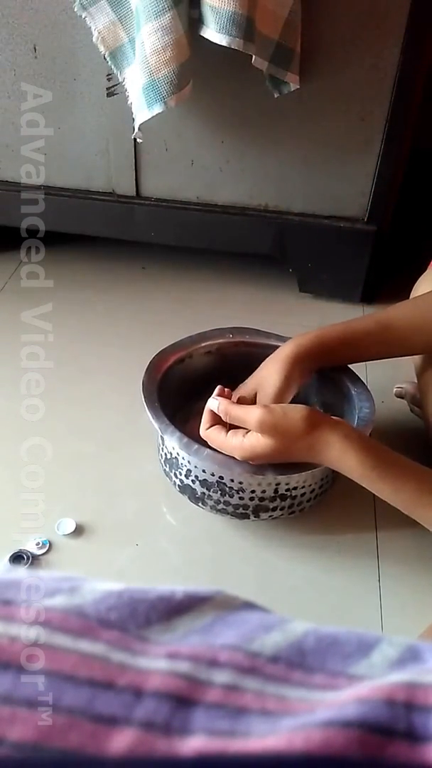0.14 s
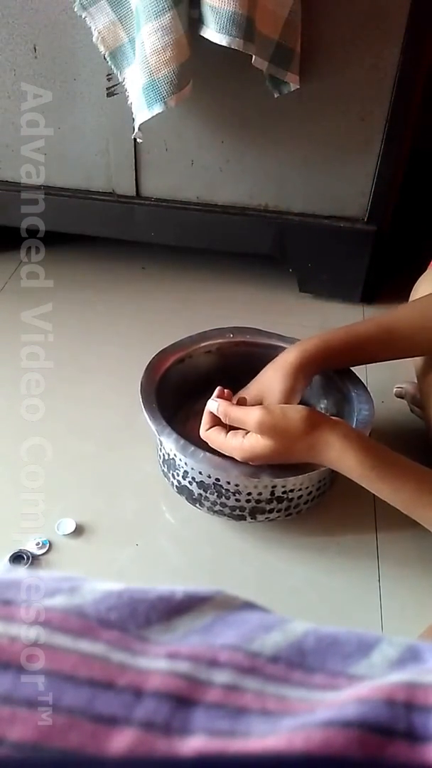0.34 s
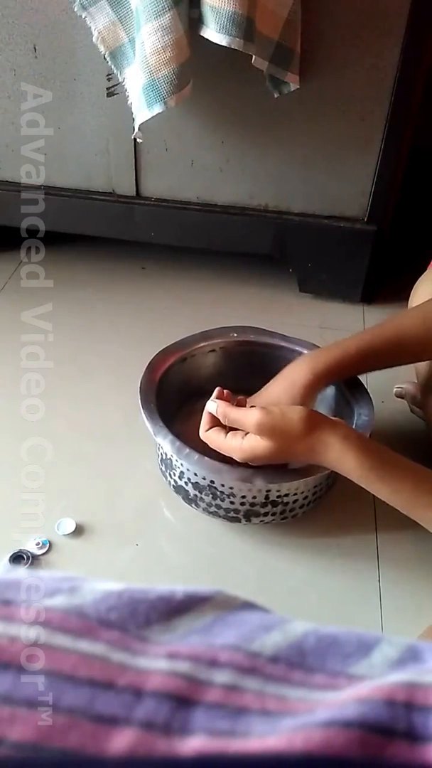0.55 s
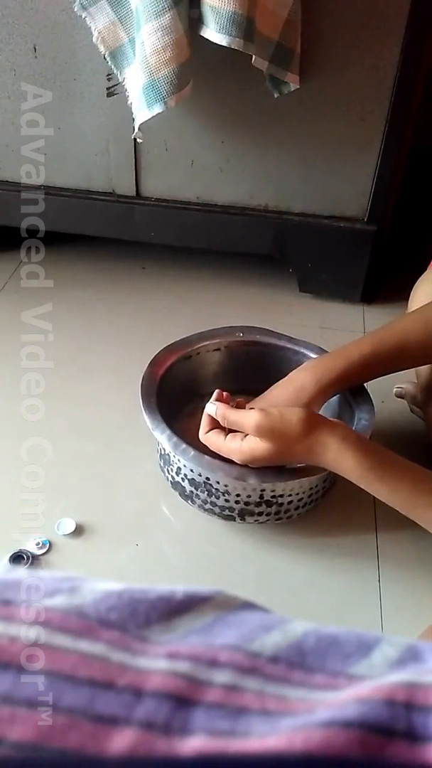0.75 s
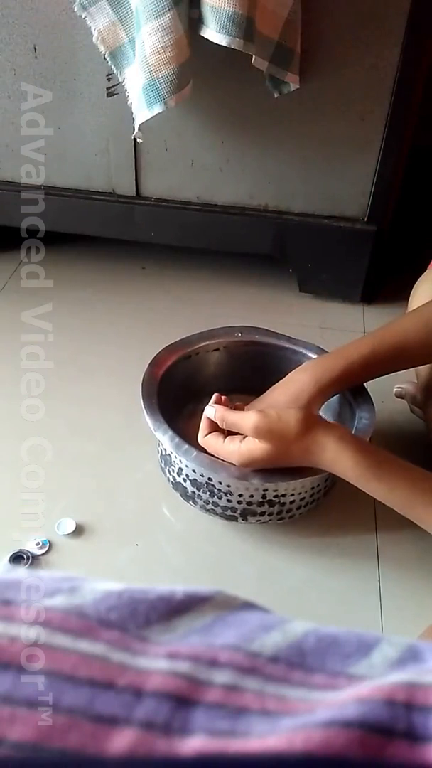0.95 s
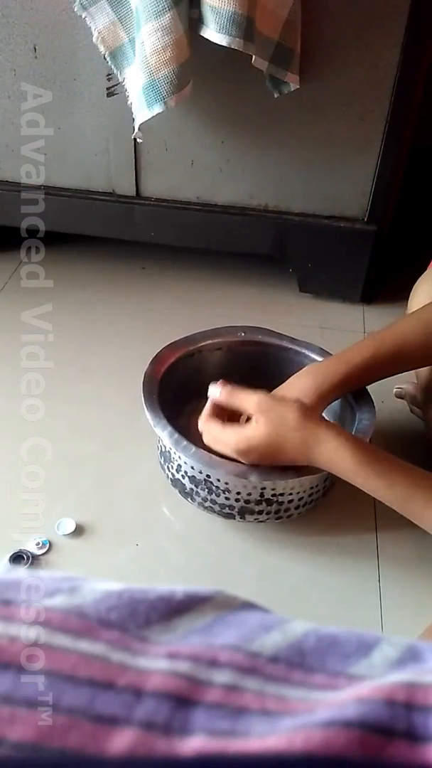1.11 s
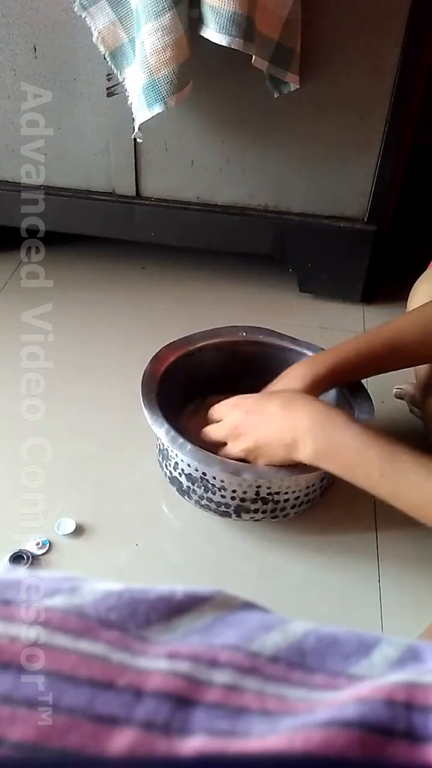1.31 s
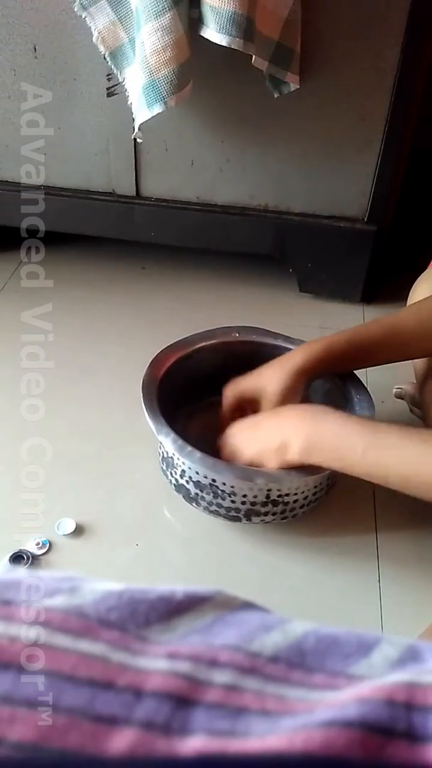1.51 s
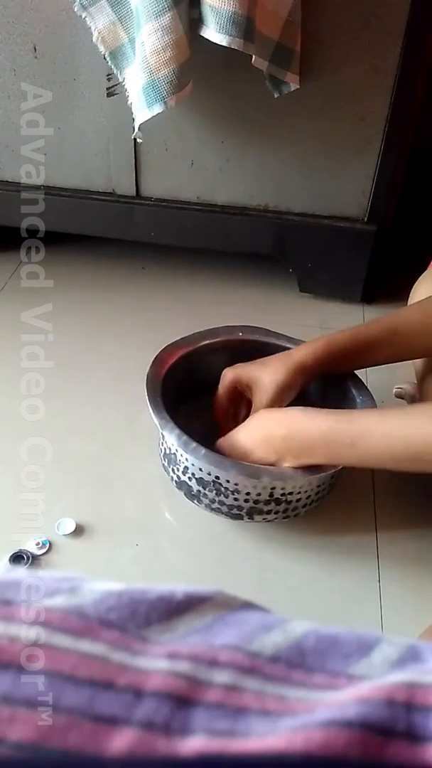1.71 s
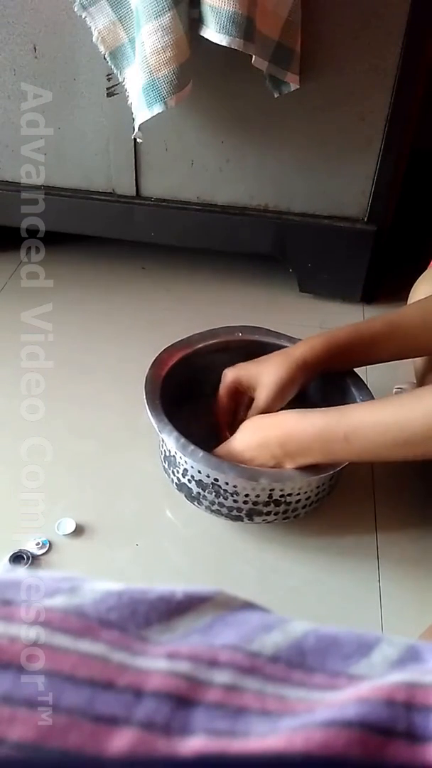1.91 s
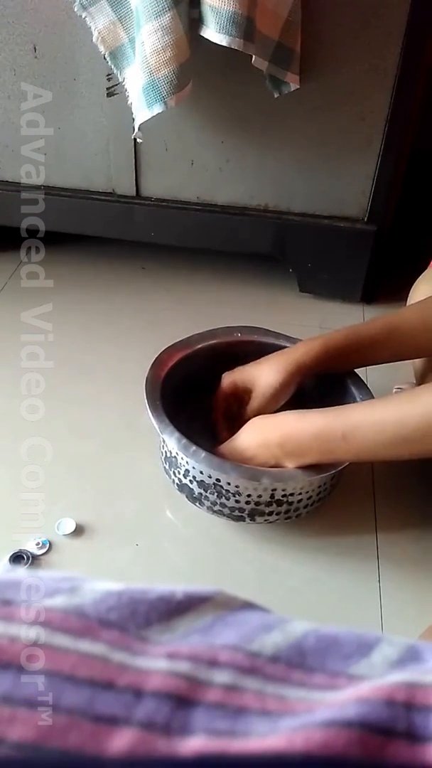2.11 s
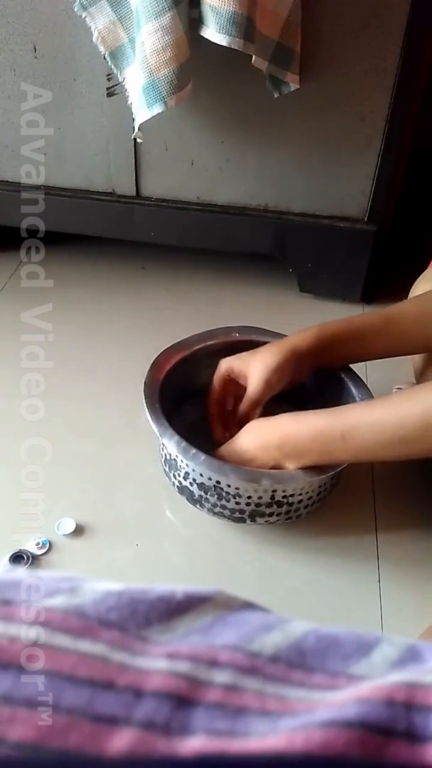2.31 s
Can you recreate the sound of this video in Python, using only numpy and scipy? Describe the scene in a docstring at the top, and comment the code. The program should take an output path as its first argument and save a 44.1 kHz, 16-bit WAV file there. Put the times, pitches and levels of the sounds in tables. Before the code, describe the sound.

A small metal bearing clinks, rattles and scrapes against a steel bowl of water in a small hard room. The knocks fade, fingers swish the water and a few drips follow, over faint hiss and hum, mostly to the right.

```python
"""A small metal bearing knocks against a steel bowl of water in a small hard room, over hiss and hum.
From 0.2 s it rattles and scrapes: each contact is a burst of noise that rings the bowl's normal modes.
Near 1.4 s the knocks fade and wet fingers swish; from 1.7 s drips sound as small resonating bubbles,
with one last faint knock among them. Throughout, the knocks reach the right microphone directly
and the left mostly by reflection off a wall."""
import sys
import numpy as np
from scipy import signal
from scipy.fft import rfft, irfft, next_fast_len
from scipy.io import wavfile
from scipy.ndimage import uniform_filter1d, minimum_filter1d

SR = 44100
rng = np.random.default_rng(int(sys.argv[2]) if len(sys.argv) > 2 else 0)


def master_out(mix):
    """Clip the mix to full scale and print it as 16-bit PCM to the path in sys.argv[1]."""
    frames = np.transpose(np.atleast_2d(mix))
    ceiling = np.clip(frames, -1, 1)
    pcm = np.round(ceiling * 32767).astype(np.int16)
    wavfile.write(sys.argv[1], SR, pcm)


N = 103635
TIME = np.arange(N) / SR


def amp(db):
    """Decibels as an amplitude ratio."""
    return 10 ** (np.asarray(db) / 20)


def unit_rms(x):
    """Normalisation to unit mean power."""
    return x / np.sqrt(np.mean(x ** 2) + 1e-20)


def curve_at(points, hz):
    """Interpolation along a logarithmic frequency axis."""
    point_hz, value = np.transpose(points)
    return np.interp(np.log(hz + 1), np.log(point_hz + 1), value)


def add(mix, start_s, sound):
    """Superposition: a sound joins the mix at its start time."""
    part = mix[max(round(start_s * SR), 0):][:len(sound)]
    part += sound[:len(part)]


def delayed(x, delay_s):
    """Propagation delay."""
    return np.concatenate([np.zeros(round(delay_s * SR)), x])[:N]


def equalised(x, gains):
    """Zero-phase filtering by a curve of gains in dB."""
    size = next_fast_len(N + 4096)
    return irfft(rfft(x, size) * amp(curve_at(gains, np.fft.rfftfreq(size, 1 / SR))), size)[:N]


def narrowband(x, hz, width_hz):
    """Resonance: two equal resonators in series select one band, returned at unit power."""
    carrier, pole = np.exp(2j * np.pi * hz * TIME), np.exp(-np.pi * width_hz / SR)
    for _ in range(2):
        x = (carrier * signal.lfilter([1 - pole], [1, -pole], x / carrier)).real
    return unit_rms(x)


# Each row: frequency in Hz, relative spectral density of the hiss in dB.
HISS_SPECTRUM = [(25, -24), (40, -1.5), (60, -7), (100, 2), (135, -14.5), (174, -11.5), (300, -17),
                 (540, -19.5), (800, -20.5), (1100, -26), (2000, -29), (2600, -31.5), (3300, -38),
                 (4200, -32), (8000, -35), (12000, -30.5), (14500, -36.5)]
# Each row: frequency in Hz, correlation between left and right from -1 to 1.
HISS_CORRELATION = [(60, -0.91), (150, -0.84), (400, -.5), (1200, .1), (5000, -0.044)]
def hiss(level_db=-59.5, flicker_db=2.0):
    """Partial coherence: room and microphone noise, with left and right out of phase in the bass."""
    hz = np.fft.rfftfreq(1024, 1 / SR)
    a, b, c, d, flicker = rng.standard_normal((N // 256 + 5, len(hz), 5)).T
    left, independent = a + 1j * b, c + 1j * d
    correlation = curve_at(HISS_CORRELATION, hz)[:, None]
    right = correlation * left + np.sqrt(1 - correlation ** 2) * independent
    flicker = unit_rms(uniform_filter1d(uniform_filter1d(flicker, 12, axis=0), 10, axis=1))
    spectra = np.array([left, right]) * amp(curve_at(HISS_SPECTRUM, hz)[:, None] + flicker_db * flicker)
    noise = signal.istft(spectra, nperseg=1024, noverlap=768)[1][:, :N]
    return amp(level_db) * unit_rms(noise)


# Each row: centre frequency in Hz, level in dB before the channel weights, resonator width in Hz.
HUM_BANDS = [(54, -69, 7), (98, -70, 21)]
def hum():
    """Narrowband noise is heard as a wavering tone, here partly in antiphase between the channels."""
    out = np.zeros((2, N))
    for hz, db, width_hz in HUM_BANDS:
        shared, right_only = (narrowband(rng.standard_normal(N), hz, width_hz) for _ in range(2))
        out += amp(db) * np.array([1.3 * shared, 1.4 * right_only - shared])
    return out


# Each row: frequency in Hz, reverberation time (60 dB of decay) in seconds.
ROOM_DECAY = [(400, 0.16), (900, 0.19), (2100, 0.36), (5500, 0.21), (12000, 0.21)]
WALL_DELAY_S = .012
def reverberation(x, drift_hz=2.3):
    """Diffuse reflection: echoes die at each band's own rate; two tails alternate as the hands move."""
    out, phase = np.zeros((2, N)), 2 * np.pi * drift_hz * TIME
    length = SR // 2
    slots = np.arange(120, length - 20, 12)  # one echo of random sign in every 12 samples
    for share in (np.cos(phase), np.sin(phase)):
        echoes = np.zeros((2, length))
        arrivals = slots + rng.integers(0, 12, (2, len(slots)))
        np.put_along_axis(echoes, arrivals, rng.choice([-1., 1.], arrivals.shape), 1)
        echoes[0] *= np.minimum(TIME[:length] / WALL_DELAY_S, 1) ** 2  # the left tail builds up slowly
        hz, t, spectra = signal.stft(echoes, SR, nperseg=128)
        decay = amp(-60 * t / curve_at(ROOM_DECAY, hz)[:, None])
        tail = signal.istft(spectra * decay, SR, nperseg=128)[1]
        tail /= np.linalg.norm(tail, axis=1, keepdims=True)
        out += signal.fftconvolve((x * share)[None], tail, axes=1)[:, :N]
    return out


# Each row: time in seconds, level of the treble band in dB, level of the 2 kHz band in dB.
NOISE_LEVELS = [(.19, -90, -95), (.5, -70, -85.5), (1.15, -72.5, -85), (1.42, -58.5, -71),
                (1.465, -51.5, -74), (1.5, -59, -67.5), (1.56, -66, -72), (1.6, -60, -62),
                (1.625, -63, -68), (1.655, -58, -65), (1.701, -64.5, -68), (1.749, -68.5, -70),
                (1.77, -61.5, -75.5), (1.799, -70.5, -74), (1.92, -74, -89), (1.95, -58, -79),
                (2.03, -70.5, -93), (2.12, -79.5, -82), (2.185, -60, -67), (2.229, -67.5, -73.5),
                (2.35, -75.5, -98)]
# Each row: centre frequency in Hz, resonator width in Hz; first the treble band, then the 2 kHz band.
NOISE_RESONANCES = [(9000, 4500), (2030, 170)]
def treble_hiss_and_swish():
    """Modulated noise: faint hiss grows from 0.2 s; from 1.4 s water swishes with fizz and a trickle."""
    times, *levels = np.transpose(NOISE_LEVELS)
    out = np.zeros((2, N))
    for level_db, (hz, width_hz) in zip(levels, NOISE_RESONANCES):
        envelope = amp(np.interp(TIME, times, level_db, left=-120))
        for channel in out:
            noise = rng.standard_normal(N) * amp(1.3 * rng.standard_normal(N))
            channel += envelope * narrowband(noise, hz, width_hz)
    return out


# Each row: start in seconds, level in dB, pitch in Hz, 60 dB decay time in seconds (capped below).
BUBBLES = [(1.713, -37.5, 1555, 0.033), (1.73, -45, 1580, 0.048), (1.72, -55.5, 555, 0.034),
           (1.95, -47.5, 1204, 0.046), (1.946, -43, 760, 0.018), (2.004, -43, 3750, 0.054),
           (2.018, -59.5, 3540, 0.045), (2.111, -45.5, 1163, 0.038), (2.123, -52, 1190, 0.033),
           (2.141, -50, 1107, 0.036), (2.171, -40, 1171, 0.058), (2.188, -39, 1166, 0.044),
           (2.203, -47.5, 1143, 0.057), (2.22, -50.5, 1154, 0.036), (2.24, -51, 1100, .03)]
def drips(rise_s=.004, longest_t60_s=.04, glide_per_s=.7, wobble_depth=.35):
    """Bubble resonance: each drip is a damped sine with a soft start and a slight rise in pitch."""
    out, t = np.zeros(N), TIME[:5000]
    onset = 1 - np.exp(-(t / rise_s) ** 2)
    for start_s, db, hz, t60 in BUBBLES:
        tone = np.sin(2 * np.pi * hz * (t + .5 * glide_per_s * t ** 2))
        add(out, start_s, amp(db - 60 * t / min(t60, longest_t60_s)) * onset * tone)
    wobble = unit_rms(uniform_filter1d(uniform_filter1d(rng.standard_normal(N), 140), 140))
    return out * (1 + wobble_depth * wobble)


# Each row: time in seconds, relative level of the scrape in dB.
SCRAPE_LEVELS = [(.394, -68.5), (.402, -41), (.44, -41), (0.482, -39), (.53, -36), (.58, -55), (.63, -58),
                 (.67, -45), (0.701, -48.5), (.74, -74), (0.766, -41), (.82, -51), (.9, -59.5),
                 (1.0, -65.5), (1.045, -51), (1.09, -60), (1.15, -67), (1.3, -64), (1.34, -47.5)]
# Each entry: level offset in dB for one of the six contact bands.
SCRAPE_BAND_DB = [-5, -37.5, -22.5, -8.5, -3, 0.5]
def scrape_envelopes():
    """Sliding friction: the noise amplitude in each band as the bearing drags along the steel."""
    times, level_db = np.transpose(SCRAPE_LEVELS)
    contour_db = np.interp(TIME, times, level_db, left=-120, right=-120)
    return amp(contour_db + np.array(SCRAPE_BAND_DB)[:, None])


# Each row: mode frequency in Hz, relative level in dB, 60 dB decay time in seconds.
BOWL_MODES = [(572.4, -11, 0.11), (926, -4.5, 0.098), (1053, -4, 0.084), (1584, -1, 0.12),
              (1695, -9.5, 0.13), (1964, -5.5, .14), (2320, -6, 0.14), (2370, -15.5, 0.051),
              (2800, -7.5, 0.144), (2820, -16, .12), (3980, -11.5, .05), (4450, -6.5, 0.071),
              (4690, 2, .05), (7440, -10, 0.041)]
def bowl_ring(impulses):
    """Normal modes: the bowl answers each impulse with a sum of damped sines."""
    t = TIME[:12000]
    response = sum(amp(db - 60 * t / t60) * np.sin(2 * np.pi * hz * t) for hz, db, t60 in BOWL_MODES)
    return signal.oaconvolve(impulses, response / np.linalg.norm(response))[:N]


# Each row: lower edge in Hz, upper edge in Hz; bands near 4.5, 0.55, 1, 2, 5.7 and 9 kHz.
CONTACT_BANDS = [(3900, 5100), (450, 620), (1000, 1130), (1250, 2900), (5100, 6400), (6400, 13500)]
# Each row: time in seconds, relative level of the first band in dB, offsets of the other five in dB,
# rise time in seconds, rattle time in seconds (lengthened if too short), ring offset in dB.
IMPACTS = [(0.2035, -15, -18.5, -12.5, -5.5, -1.5, 0.5, 0.001, 0.012, -10.5),
           (0.2108, -18.5, -22, -15, -7, -3, -10.5, 0.00097, 0.0056, -7),
           (0.3981, -24.5, -50.5, -23.5, -8.5, -0.5, -7, 0.0036, 0.0041, -18.5),
           (0.4034, -27.5, -55, -31, -24, -4, -12, 0.0027, 0.0063, -35),
           (0.4084, -25.5, -48, -44, -5, -19, -19, 0.002, 0.0061, -14),
           (0.4332, -34, -24.5, -10, 1.5, 11.5, -9, 0.00072, 0.0023, -14),
           (0.4585, -26.5, -54, -15.5, -18, -2, -3, 0.0025, 0.01, -4),
           (0.4687, -19, -59, -42.5, -12, -6.5, -11.5, 0.0017, 0.0042, -12.5),
           (0.483, -29.5, -42, -31, -15.5, -11.5, -9.5, 0.0007, 0.0023, -16.5),
           (0.4951, -25, -29.5, -31, -20.5, -3.5, -8.5, 0.0012, 0.005, -13),
           (0.52, -26.5, -40, -35, -17.5, 1, -3, 0.0014, 0.0023, -21.5),
           (0.5192, -25, -41, -34, -18, 0, -1.5, 0.0012, 0.0029, -22.5),
           (0.5325, -30.5, -39, -27, -10, -6.5, 0, 0.0012, 0.0028, -8.5),
           (0.6924, -43.5, -41, -19, -10.5, -9, -3, 0.0014, 0.015, -11.5),
           (0.7046, -41, -36, -31, -4, -2, -14, 0.0012, 0.0035, -20),
           (0.7719, -34.5, -41, -11.5, -9.5, -5, -8, 0.0016, 0.0061, -10),
           (0.7839, -36.5, -40, -9, -7, -9, -3, 0.0011, 0.0042, -19),
           (0.922, -48.5, -16, -3.5, -7, -13, -11, 0.0017, 0.0091, -22),
           (1.041, -51, -26, -9, -8, -7, -24, 0.0014, 0.016, -6.5),
           (1.0597, -48.5, -21, -7.5, -2, -12, -19, 0.001, 0.007, -18),
           (1.1688, -43, -26, -18, -9.5, -3.5, -2, 0.002, 0.0051, -17),
           (1.2532, -32, -41, -22.5, -8, -3.5, -4.5, 0.002, 0.007, -9),
           (1.2683, -42, -36, -19, -6.5, -15, -6.5, 0.0011, 0.021, -9),
           (1.3511, -32, -33, -7.5, -5, -1, -2.5, 0.00096, 0.0073, -14.5),
           (1.3517, -27.5, -27.5, -17.5, -10.5, -7, -8, 0.001, 0.0096, -9.5),
           (1.4614, -57.5, -12, -13, -6, -11, 7.5, 0.0012, 0.009, -21),
           (1.9388, -52.5, -10.5, -9, -11.5, -6, -3.5, 0.0012, 0.012, -27)]
def bearing_on_bowl(burst_gain_db=3, ring_gain_db=29, shortest_rattle_s=.004):
    """Impact excitation: each knock adds a noise burst to the scrape and sets the bowl ringing."""
    envelopes, impulses = scrape_envelopes(), np.zeros((len(CONTACT_BANDS), N))
    for time_s, db, *offsets_db, rise_s, rattle_s, ring_db in IMPACTS:
        from_peak = TIME[:3000] - 3 * rise_s
        attack = np.exp(np.minimum(from_peak, 0) / rise_s)
        decay = np.exp(-(np.maximum(from_peak, 0) / max(rattle_s, shortest_rattle_s)) ** 1.5)
        for band, band_db in enumerate(db + np.array([0] + offsets_db)):
            add(envelopes[band], time_s - 2.1 * rise_s, amp(band_db + burst_gain_db) * attack * decay)
            add(impulses[band], time_s, amp([band_db + ring_db + ring_gain_db]))
    noise = unit_rms(rng.standard_normal(N))
    contact, drive = np.zeros((2, N))
    for (low_hz, high_hz), envelope, kicks in zip(CONTACT_BANDS, envelopes, impulses):
        bandpass = signal.butter(3, [low_hz, high_hz], "band", fs=SR, output="sos")
        gain = .5 * np.sqrt(SR / 2 / (high_hz - low_hz))  # equal power for any bandwidth
        contact += gain * signal.sosfilt(bandpass, envelope * noise)
        drive += gain * signal.sosfilt(bandpass, kicks)
    return contact + bowl_ring(drive)


# Each row: frequency in Hz, gain in dB applied to the sound of bearing and bowl.
STEEL_COLOUR = [(450, 1.5), (800, 4.5), (1500, 0.5), (2500, 2.5), (3300, 2), (3900, -3.5), (4350, 2.5),
                (4900, 0), (5600, 2.5), (6500, 1.5), (7700, 8), (9200, 1.5), (11000, 0.5), (13000, -10.5)]
# Each row: frequency in Hz, gain in dB on the paths to the left microphone.
LEFT_COLOUR = [(300, 1.5), (700, 5.5), (1400, -3), (2800, -5), (4600, -13), (9000, -4.5), (13000, 3)]
def scene():
    """Multipath propagation: direct sound, wall echo and reverberation add at each microphone."""
    water = drips()
    steel = equalised(bearing_on_bowl(), STEEL_COLOUR)
    direct = steel + water
    echo = delayed(direct, WALL_DELAY_S)
    left_tail, right_tail = reverberation(steel + amp(-7) * water)
    left = equalised(amp(-11) * direct + amp(-8) * echo + amp(-1.5) * left_tail, LEFT_COLOUR)
    right = direct + amp(-26) * delayed(echo, .004) + amp(-4) * right_tail
    bass = signal.sosfiltfilt(signal.butter(4, 720, fs=SR, output="sos"), right)
    left -= amp(-6.9) * bass  # the left microphone hears the bass inverted
    return np.array([left, right]) + treble_hiss_and_swish() + hiss() + hum()


def record(dry):
    """Peak limiting and band limiting: a quick gain dip holds the loudest peaks, then a low-pass acts."""
    ceiling, cutoff_hz = .55, 14420
    held_peak = -minimum_filter1d(-abs(dry).max(0), size=161)
    peak = uniform_filter1d(held_peak, size=81)
    limited = dry * np.minimum(1, ceiling / (peak + 1e-9))
    lowpass = signal.firwin(1023, cutoff_hz, window=("kaiser", 11), fs=SR)
    return signal.oaconvolve(limited, lowpass[None], "same")


dry = scene()
out = record(dry)
master_out(out)
```